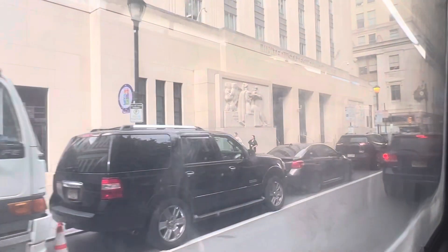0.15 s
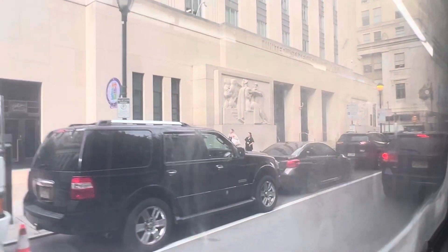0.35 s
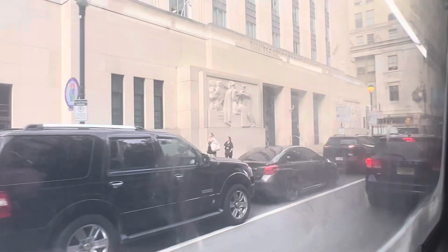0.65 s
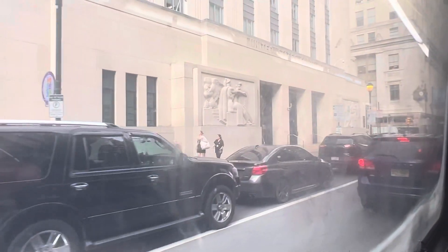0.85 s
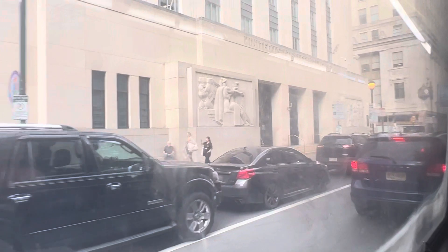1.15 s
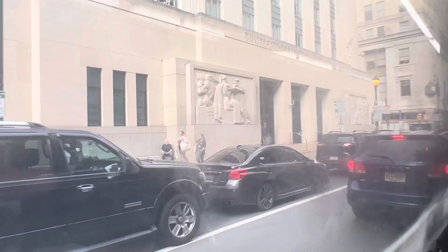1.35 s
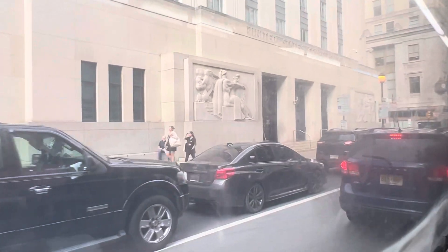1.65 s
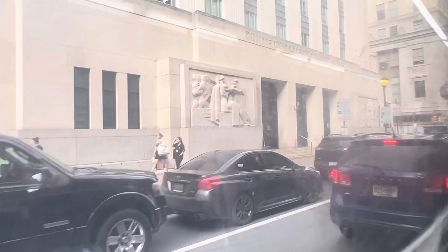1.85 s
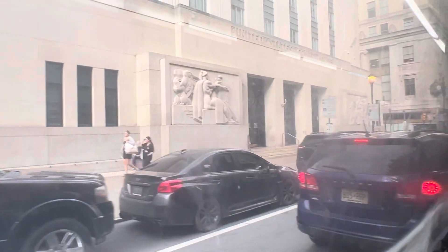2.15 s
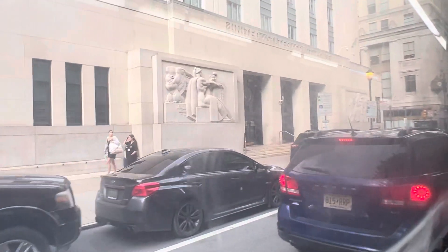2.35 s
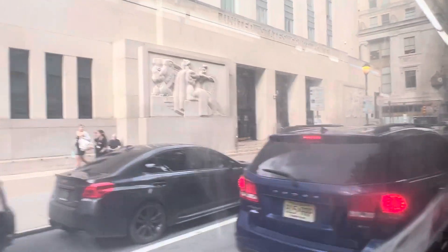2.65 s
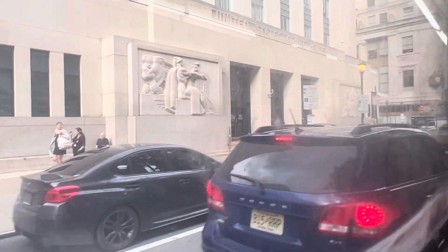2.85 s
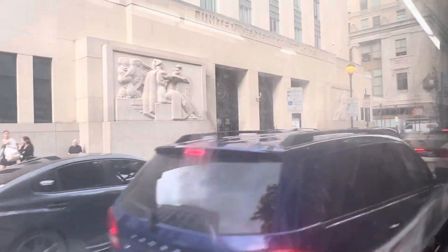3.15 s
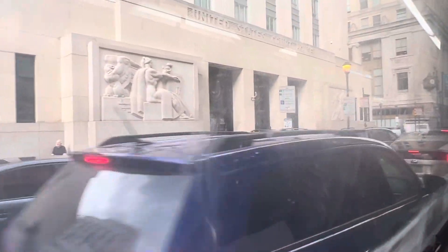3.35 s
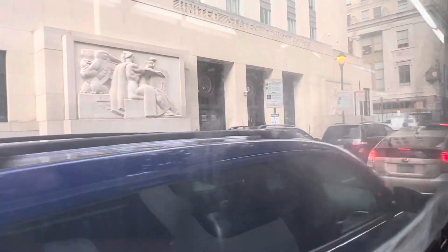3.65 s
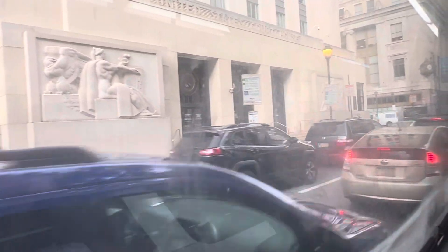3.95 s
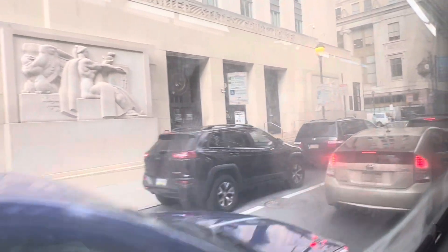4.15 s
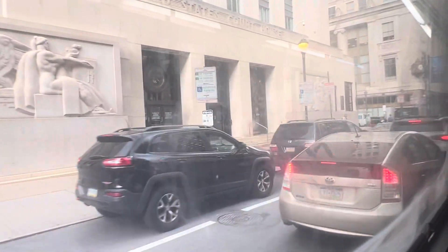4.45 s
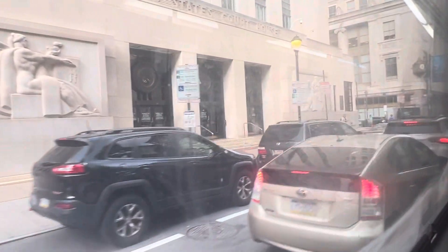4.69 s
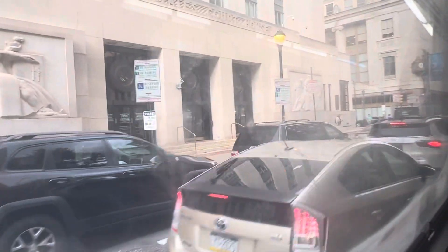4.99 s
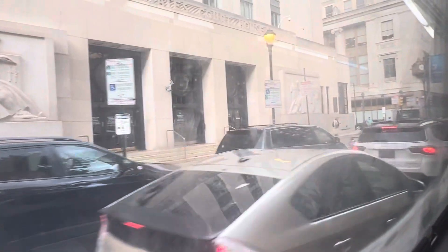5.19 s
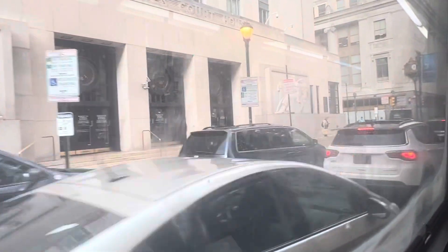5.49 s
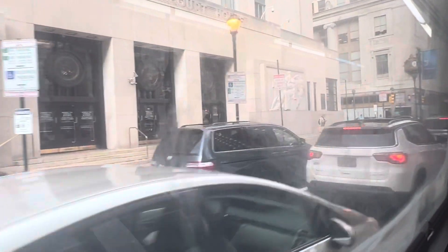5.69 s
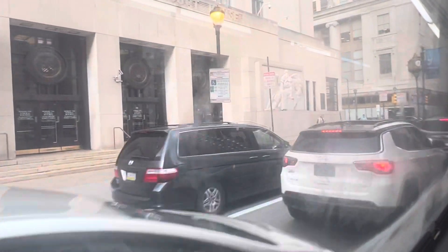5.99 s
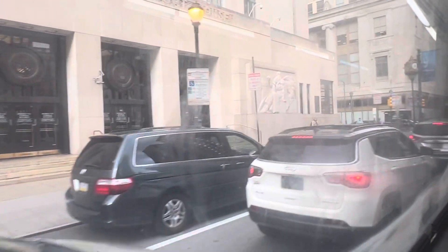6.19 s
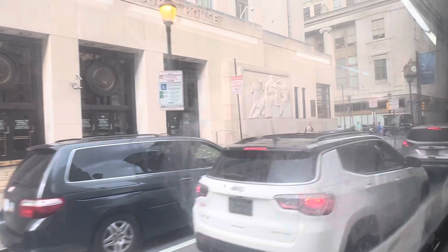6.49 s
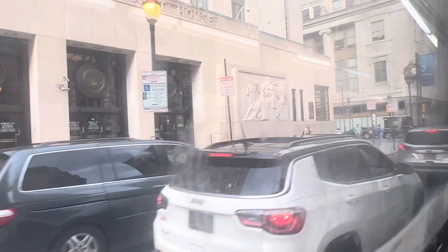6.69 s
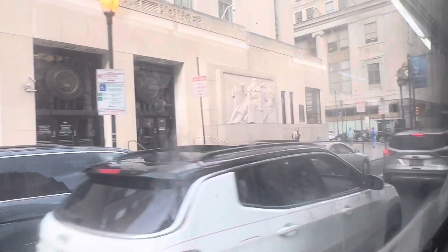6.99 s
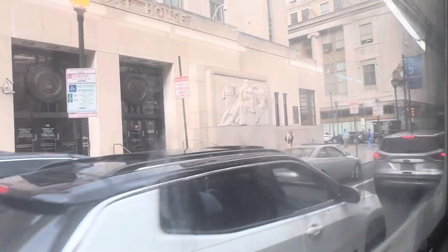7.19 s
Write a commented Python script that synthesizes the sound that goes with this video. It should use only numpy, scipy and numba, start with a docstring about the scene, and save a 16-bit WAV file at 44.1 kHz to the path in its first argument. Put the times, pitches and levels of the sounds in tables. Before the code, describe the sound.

Inside a city bus, a diesel idles, pulls away with a floor thud, climbs to a booming roar, then eases off amid rattling window frames.

```python
"""Inside a city bus: a six-cylinder diesel idles under gliding low hums and loose frames rattle.
It pulls away, a bump thuds through the floor, the gearbox locks, and the engine climbs, then eases off.
Sines at engine orders make the boom; noise gated at each firing rings the block as knock.
Filtered noise makes body rumble, knocks and squeaks; random clicks in resonances make the rattle.
Gliding sines make the drumming floor, the hums and, late in the ride, thin whines."""
import sys
import numpy as np
from scipy import signal
from scipy.io import wavfile
from scipy.ndimage import uniform_filter1d
from numba import njit

SR = 44100
rng = np.random.default_rng(int(sys.argv[2]) if len(sys.argv) > 2 else 0)


def generate_wav(signal):
    """Clip the signal to [-1, 1] and save it as 16-bit WAV at the path in sys.argv[1]."""
    frames = np.transpose(np.atleast_2d(signal))
    scaled = np.clip(frames, -1, 1) * 32767
    pcm = np.round(scaled).astype(np.int16)
    wavfile.write(sys.argv[1], SR, pcm)


N = 323253
TIME = np.arange(N) / SR
OPPOSITE = np.array([[1], [-1]])  # signs of a left-right difference
BASS_LAG = 17  # samples by which low sound reaches the left port later

# Strong engine orders, as multiples of the cycle rate; order 6 is the firing rate
TONE_ORDERS = (6, 9, 11, 12, 18)
# Resonances of the engine block: centre_hz, width_hz, level_db
BLOCK_MODES = [(565.4, 36, 4.5), (725, 33, 0), (957, 35, -2), (1170, 59, -1.5), (1490, 55, -4),
               (1710, 67, -5), (1860, 29, -9.5), (2086, 45, -7), (2178, 77, -7.5), (2372, 33, -11.5),
               (2563, 28, -14), (3185, 110, -21)]


def undb(db):
    """Amplitude ratio from the logarithmic decibel scale."""
    return 10 ** (np.asarray(db) / 20)


def level(x, db):
    """Scale by root-mean-square amplitude, the measure of signal power."""
    return x * undb(db) / np.sqrt(np.mean(x ** 2))


def curves(table):
    """Linear interpolation in time of each column of a table."""
    s, *columns = np.transpose(table)
    return [np.interp(TIME, s, column) for column in columns]


def at(points, hz):
    """Linear interpolation of a spectrum on a log-frequency axis."""
    points = np.array(points)
    return np.interp(np.log(hz), np.log(points[:, 0]), points[:, 1])


@njit
def svf(x, hz, width):
    """Second-order resonance: a state-variable band-pass of gain 1 at its centre."""
    y, band, low = np.empty(len(x)), 0., 0.
    g, damping = np.tan(np.pi * hz / SR), width / hz
    for i in range(len(x)):
        v = (band + g * (x[i] - low)) / (1 + g * (g + damping))
        band, low, y[i] = 2 * v - band, low + 2 * g * v, damping * v
    return y


def resonate(x, hz, width):
    """Two equal resonances in cascade, which steepen the skirts of the band."""
    hz, width = float(hz), float(width)
    return svf(svf(x, hz, width), hz, width)


def ring(x, modes):
    """Modal superposition: resonances summed with alternating sign."""
    out = 0
    for k, (hz, width, db) in enumerate(modes):
        out = out + (-1) ** k * undb(db) * svf(x, float(hz), float(width))
    return out


def walk(rate):
    """Low-pass random process: levels held 1 / rate s and smoothed twice; spread near 1."""
    k = int(SR / rate)
    steps = np.repeat(rng.standard_normal(N // k + 1), k)
    return 1.52 * uniform_filter1d(uniform_filter1d(steps, k), k)[:N]


def late(pair, lag):
    """Interaural delay: shift the left channel by lag samples, earlier if negative."""
    left, right = pair
    return np.array([left[np.clip(np.arange(N) - lag, 0, N - 1)], right])


def ports(near, far, lag, share):
    """Direct and diffuse field: a near path delayed on the left, and a part of opposite signs."""
    return late([near, near], lag) + share * far * OPPOSITE


def spread(mid, side, hz):
    """Interchannel coherence: mid and side noise mixed to the cabin's likeness and lean at this pitch."""
    # Left-right likeness: pitch_hz, correlation
    likeness = [(30, .99), (300, .96), (480, .2), (8000, .1)]
    # Left minus right level: pitch_hz, difference_db
    lean = [(60, 0), (120, .8), (300, -.7), (700, -2.4), (2400, -4.8), (4400, -1)]
    like = np.clip(at(likeness, hz), -.99, .999)
    pair = np.sqrt(1 + like) * mid + np.sqrt(1 - like) * side * OPPOSITE
    return pair * undb(OPPOSITE * at(lean, hz) / 2) / np.sqrt(2)


def engine(hz, load_db, rumble_db):
    """Periodic excitation: one firing count drives the boom, the weaker orders and the knock."""
    firings = np.cumsum(hz * (1 + 0.0024 * walk(14))) / SR  # the speed wavers a little
    boom = firing_boom(firings, hz, load_db) + weak_orders(firings) * undb(rumble_db)
    return late([boom, boom], BASS_LAG) + knock(firings)


def order_tone(firings, order, db):
    """A harmonic of the engine cycle, which holds six firings, at a random phase."""
    return undb(db) * np.sin(2 * np.pi * (order * firings / 6 + rng.random()))


def firing_boom(firings, hz, load_db):
    """Cabin resonance colours the strong orders as they sweep in pitch."""
    # One row per strong order: level_db at 0 dB load, before cabin boom; load_slope_db per dB; lock_gain_db
    tone_levels = [(-13.5, 0.42, 4), (-21.5, 1, 6.5), (-27.5, -0.4, 5), (-12, 1, -0.5), (-16, 2, 1.5)]
    # Strength of cabin boom: pitch_hz, level_db
    cabin_boom = [(32, -17.5), (45, -10.5), (52, -5), (61, -7.5), (70, 0), (80, -3.5), (92, -8), (104, -8),
                  (118, -3.5), (126, -1), (134, -2), (142, -8.5), (150, -6.5), (160, -21.5), (200, -10),
                  (240, -16.5)]
    # Brief drops of one order: centre_s, half_length_s, order, depth_db
    dips = [(5.52, .06, 6, -15), (6.34, .1, 6, -18), (7.05, .25, 6, -9), (7.1, .04, 12, -14)]
    # the gearbox locks the engine to the wheels, and the driveline carries the firing into the floor
    lock_s, unlock_s, clutch_s = 2.7, 5.42, 0.023
    locked = np.clip(np.minimum(TIME - lock_s, unlock_s - TIME) / clutch_s + .5, 0, 1)
    flicker_db = 2.6 - 1.1 * locked  # the tones flicker more while the engine runs free
    boom = 0
    for order, (db, slope, lock_gain) in zip(TONE_ORDERS, tone_levels):
        tone_db = db + slope * load_db + lock_gain * locked + at(cabin_boom, order * hz / 6)
        for s, half, dipped, depth in dips:
            if dipped == order:
                tone_db = tone_db + depth * np.exp(-((TIME - s) / half) ** 2)
        boom = boom + np.sqrt(2) * order_tone(firings, order, tone_db + flicker_db * walk(11))
    return boom


def weak_orders(firings):
    """Modal filtering: orders filled in by unequal cylinders are picked out by the cabin modes."""
    # Cabin resonances: centre_hz, width_hz, level_db
    cabin_modes = [(64.5, 17, 1.5), (134, 25.4, 0.5), (163.4, 20, -8.5), (191.1, 11.7, 1),
                   (250.2, 23.4, -5.5), (306, 34, -9), (400, 25, -15.5), (461, 17, -22)]
    weak = 0
    for order in range(4, 44):
        if order not in TONE_ORDERS:
            # every third order is tied to the firing rate and stronger
            weak = weak + order_tone(firings, order, 5 * (order % 3 == 0) + 2.5 * walk(7))
    return level(ring(weak, cabin_modes), -0.73)


def knock(firings):
    """Impulsive excitation: decaying noise at each firing rings the modes of the block."""
    # Unequal paths from the six cylinders in turn: level_db
    cylinders_db = (-2.5, -3, -3, -5, -3.5, -8)
    # Course of the knock before a common gain: time_s, level_db
    clatter = [(0.0, -53.5), (0.26, -56), (1.36, -53), (1.38, -50), (3.58, -45), (4.15, -50), (5.18, -47.5),
               (5.28, -51.5), (5.3, -53), (7.11, -58), (7.27, -55)]
    count = firings.astype(int)
    size_db = np.array(cylinders_db)[count % 6] + rng.standard_normal(N // 100)[count]
    gate = 0.2 + np.exp(-(firings % 1) / 0.59) * undb(size_db)  # decay in firing intervals
    near, far = (gate * rng.standard_normal(N) for _ in range(2))
    modal = 0
    for k, mode in enumerate(BLOCK_MODES):
        hz, width, _ = mode
        pair = np.array([svf(ring(x, [mode]), float(hz), 3.3 * width) for x in (near, far)])
        # each mode swells and fades by itself, at random
        modal = modal + (-1) ** k * undb(1.4 * walk(5)) * pair
    # the left port hears the knock 16 samples early
    sound = ports(*level(modal, -2.1), -16, 0.48) + level(strands(), -6)
    return sound * undb(curves(clatter)[0] + 9 - 1.8 * OPPOSITE)


def strands():
    """Transient modal response: panels ring in short, uneven tones near the block's modes."""
    count, middle_s, detune = 1100, .08, .025  # detune: relative spread of pitch
    out, modes = np.zeros((2, N)), np.array(BLOCK_MODES)
    draws = np.c_[rng.random((count, 4)), rng.standard_normal((count, 2))]
    for when, which, long, pan, off, size in draws:
        hz, _, db = modes[int(which * len(modes))]
        t = TIME[:int(middle_s * (.5 + long) * SR)]
        tone = np.hanning(len(t)) * undb(db + 1.3 * size) * np.exp(2j * np.pi * hz * (1 + detune * off) * t)
        turned = tone * np.exp(2j * np.pi * pan)  # a random phase between the ports
        start = int(when * (N - len(t)))
        out[:, start:start + len(t)] += np.array([tone.real, turned.real])
    return out


def windows(rattle_db):
    """Impact noise: dense tiny clicks excite frames and panes; small jolts start bursts that die away."""
    # Resonances of loose window frames: centre_hz, width_hz, level_db
    frame_modes = [(4400, 4600, -6), (6000, 1970, 2), (8650, 3460, 3), (10800, 1900, -3.5),
                   (14900, 1700, -7.5)]
    # Resonances of the panes: centre_hz, width_hz, level_db
    pane_modes = [(5003, 30, 0), (5674, 30, 0), (7900, 150, -1), (8436, 40, 1.5), (12444, 25, -3)]
    jolts = (rng.random(N) < 14 / SR) * rng.random(N)  # 14 a second on average
    bursts = 1 + 1.8 * signal.lfilter([1], [1, -np.exp(-1 / (0.024 * SR))], jolts)  # 0.024 s decay
    out = []
    for _ in range(2):
        clicks = (rng.random(N) < 2500 / SR) * rng.standard_normal(N)
        clicks = clicks * undb(2.3 * rng.exponential(size=N))
        chatter = level(clicks, -22.0) + rng.standard_normal(N)
        frames = sum(undb(db) * resonate(chatter, hz, width) for hz, width, db in frame_modes)
        out.append(level(frames, 0) + level(ring(chatter, pane_modes), -12))
    # the rattle reaches the left port 11 samples later
    return ports(*out, 11, .4) * bursts * undb(rattle_db + 0.76 * walk(14))


def shaking():
    """Power addition: each rough stretch of road swells and dies away over a faint rest, in dB."""
    # Shakes of the frames: peak_s, rise_s, fall_s, level_db
    shakes = [(.1, 0.24, 0.28, -61.5), (.5, 0.08, 0.28, -63), (.95, 0.07, 0.098, -67),
              (1.5, 0.065, 0.063, -58), (1.71, 0.034, 0.12, -53), (1.97, 0.033, 0.092, -57.5),
              (2.2, 0.082, 0.072, -49), (2.47, 0.078, 0.089, -50.5), (2.9, 0.28, 0.2, -52),
              (3.31, 0.071, 0.073, -48), (3.42, 0.14, 0.14, -47), (3.62, 0.16, 0.15, -55.5),
              (3.85, 0.031, 0.096, -53.5), (4.249, 0.54, 0.21, -55), (5.001, 0.21, 0.17, -66.5),
              (5.5, 0.17, 0.066, -63), (6.05, 0.25, 0.13, -57), (6.33, 0.07, 0.13, -60.5),
              (6.56, 0.11, 0.085, -61.5), (7.03, 0.14, 0.27, -51.5)]
    rest_db, edge = -68, 1.8  # edge 1 = pointed, 2 = rounded
    power = undb(rest_db) ** 2
    for s, rise, fall, db in shakes:
        away = np.abs(TIME - s) / np.where(TIME < s, rise, fall)
        power = power + (undb(db) * np.exp(-away ** edge)) ** 2
    return 10 * np.log10(power)


def bumps():
    """Damped vibration: the floor drums and sinks in pitch after a wheel hits a step in the road."""
    # Floor drumming: start_s, start_hz, end_hz, level_db before attack and decay, t60_s
    steps = [(1.671, 79.1, 49.3, -6, 1)]
    out = np.zeros(N)
    for s, start_hz, end_hz, db, t60 in steps:
        t = np.maximum(TIME - s, 0)
        hz = end_hz + (start_hz - end_hz) * np.exp(-t / 0.047)
        envelope = undb(db - 60 * t / t60) * (1 - np.exp(-t / 0.043))
        out += envelope * np.sin(2 * np.pi * np.cumsum(hz) / SR)
    return out


def thuds():
    """Broad resonance: dull knocks come through the floor."""
    # Knocks: start_s, attack_s, decay_s, centre_hz, width_hz, level_db before the envelope
    knocks = [(1.635, 0.012, 0.043, 400, 340, -26.5), (1.715, .015, 0.044, 168, 158, -18),
              (3.8, 0.019, 0.055, 675, 249.8, -29.5)]
    return noise_strokes(knocks)


def squeaks():
    """Friction noise: fittings give short rubs and ticks in one resonance each."""
    # Rubs and ticks: start_s, attack_s, decay_s, centre_hz, width_hz, level_db before the envelope
    rubs = [(.825, 0.0052, 0.03, 3900, 1400, -48), (.84, .02, 0.069, 3320, 120, -54),
            (1.703, 0.00063, 0.012, 5800, 5700, -46), (1.71, .004, .045, 5200, 2000, -46.5),
            (1.755, .002, 0.0083, 6000, 900, -53), (4.82, 0.018, 0.065, 3480, 500, -51),
            (5.5, 0.047, 0.052, 5082, 1100, -46), (5.525, 0.029, 0.029, 4624, 120, -42)]
    return noise_strokes(rubs)


def noise_strokes(table):
    """Amplitude modulation: fluttering noise in one resonance rises and decays exponentially."""
    out = np.zeros((2, N))
    for s, attack, decay, hz, width, db in table:
        start, n = int(s * SR), int(8 * (attack + decay) * SR)
        t = TIME[:min(n, N - start)]
        shape = (1 - np.exp(-t / attack)) * np.exp(-t / decay) * undb(db + 2 * walk(60)[:len(t)])
        # the resonance settles before the part that is kept
        noise = [level(resonate(rng.standard_normal(N // 2), hz, width), 0)[-len(t):] for _ in range(2)]
        out[:, start:start + len(t)] += shape * spread(*noise, hz)
    return out


def low_hums():
    """Frequency modulation: low hums glide in pitch, some as engine orders, some as cabin resonance."""
    # Hums: start_s, end_s, start_hz, end_hz, level_db
    glides = [(0, 0.705, 155, 138, -30.5), (0, 0.694, 107.3, 96.7, -35), (2.7, 3.245, 146, 167.1, -16),
              (3.249, 4.15, 148.8, 137.7, -19), (5.284, 5.68, 124.2, 129.8, -25.5),
              (5.506, 6, 79.78, 66.43, -25.5), (5.88, 6.3, 131.5, 122.7, -22.5),
              (6.3, 6.9, 122.4, 114.2, -25.5), (6.897, 7.336, 167.5, 146, -26)]
    return gliding_tones(glides)


def whines():
    """Narrow-band friction tones: rubbing fittings whine thinly."""
    # Whines: start_s, end_s, start_hz, end_hz, level_db
    rubbing = [(4.52, 4.62, 6230, 6160, -68), (4.82, 5.14, 3420, 3470, -63.5)]
    return gliding_tones(rubbing)


def gliding_tones(table):
    """Phase as the integral of frequency: soft sines fade in, slide in pitch and fade out."""
    out = np.zeros(N)
    for start, end, start_hz, end_hz, db in table:
        part = np.clip((TIME - start) / (end - start), 0, 1)
        hz = start_hz + (end_hz - start_hz) * part
        fade = np.sqrt(2 * np.sin(np.pi * part).clip(0))
        out += fade * undb(db + 1.75 * walk(15)) * np.sin(2 * np.pi * np.cumsum(hz) / SR)
    return out


def body(rumble_db, panel_db):
    """Band-filtered random noise: third-octaves of road and panels swell together and flicker alone."""
    # Spectral density of the noise before each part is levelled: pitch_hz, density_db per Hz
    rumble_spectrum = [(22, -21.5), (68, -22.5), (250, -10), (420, -22.5), (680, -32), (880, -29),
                       (1170, -31.5), (1370, -38), (1950, -38), (2840, -48), (7000, -55.5)]
    low, high, swell = 0, 0, walk(2.166)
    for hz in 25 * 2 ** (np.arange(26) / 3):
        mid, side = (resonate(rng.standard_normal(N), hz, hz / 3) for _ in range(2))
        gain = undb(at(rumble_spectrum, hz) + .3 * swell + 1.8 * walk(9))
        band = gain * spread(mid, side, hz)
        if hz < 480:
            low = low + band
        else:
            high = high + band
    return late(level(low, -0.08), BASS_LAG) * undb(rumble_db) + level(high, -3) * undb(panel_db)


def scene():
    """Linear superposition: engine speed, load and road shaking drive the sources, which add up."""
    # Course of the ride: time_s, firing_rate_hz, load_db, rumble_db
    ride = [(0.0, 33.42, -14, -29), (1.2, 32.28, -12.5, -27.5), (1.4, 34.32, -8, -26),
            (1.6, 38.82, -5, -23), (1.8, 48.87, 0, -22), (2.2, 59.82, -1.5, -21.5), (2.45, 60.04, -4, -22),
            (2.62, 62.95, 1.5, -21.5), (2.8, 67.22, -2, -21), (3.2, 75.12, 2, -20.5),
            (3.42, 78.6, 1, -21.5), (3.62, 80.14, 1, -19), (4.0, 70.56, -4.5, -23.5),
            (4.5, 67.24, -3.5, -24.5), (5.2, 67.07, -5.5, -25), (5.55, 62.18, -10, -25),
            (5.85, 52.92, -9.5, -26.5), (6.15, 50.7, -4, -26.5), (6.8, 41.97, -8, -26.5),
            (7.33, 37.1, -2, -26)]
    hz, load_db, rumble_db = curves(ride)
    rattle_db = shaking()
    # upper panel noise: a part that follows the rumble (-36 dB at -20 dB) and a part that shakes add
    steady = undb(-36 + 0.8 * (rumble_db + 20.0))
    panel_db = 20 * np.log10(np.hypot(steady, undb(rattle_db + 9.5)))
    floor = low_hums() + bumps()
    sources = engine(hz, load_db, rumble_db) + windows(rattle_db)
    sources = sources + late([floor, floor], BASS_LAG) + thuds() + squeaks() + whines()
    return sources + body(rumble_db, panel_db)


def record(dry):
    """Band limiting and saturation: fade in, drop the deepest bass, round loud peaks, cut the top."""
    faded = dry * np.minimum(TIME / .01, 1)
    thin = signal.sosfilt(signal.butter(2, 22, "high", fs=SR, output="sos"), faded)
    rounded = np.tanh(0.82 * thin) / 0.75
    return signal.sosfilt(signal.ellip(8, .2, 70, 15900, fs=SR, output="sos"), rounded)


dry = scene()
out = record(dry)
generate_wav(out)
```